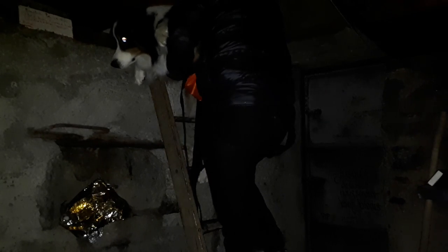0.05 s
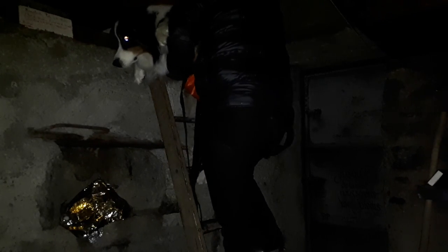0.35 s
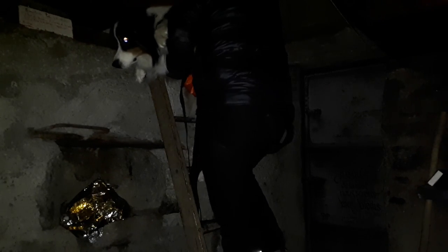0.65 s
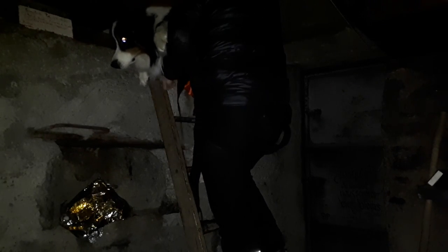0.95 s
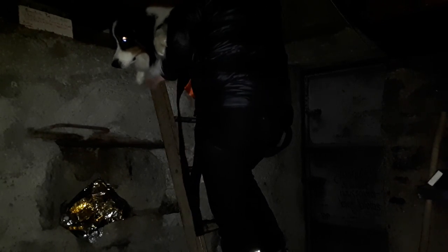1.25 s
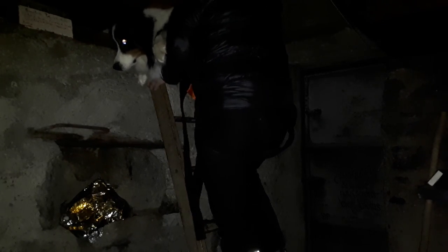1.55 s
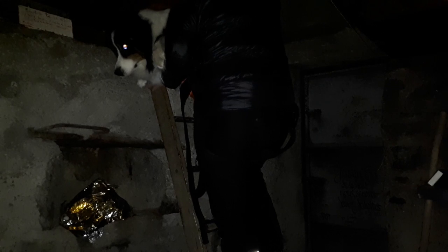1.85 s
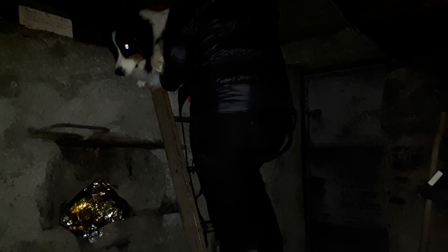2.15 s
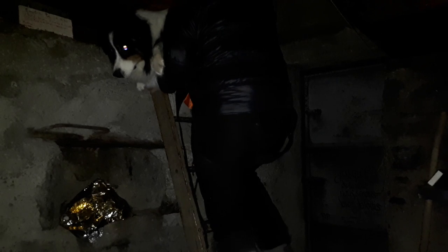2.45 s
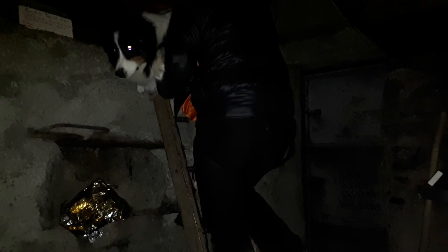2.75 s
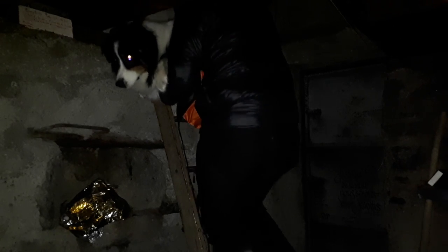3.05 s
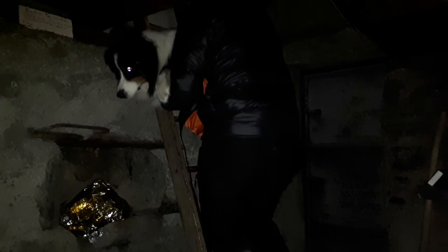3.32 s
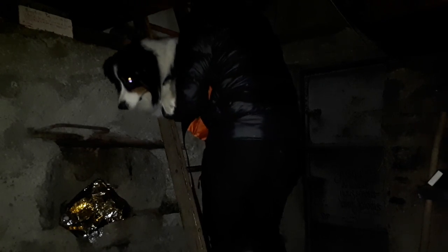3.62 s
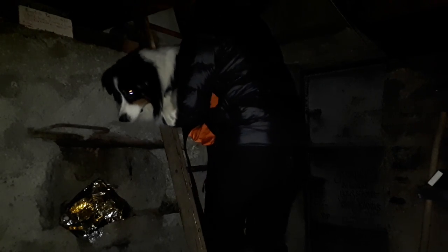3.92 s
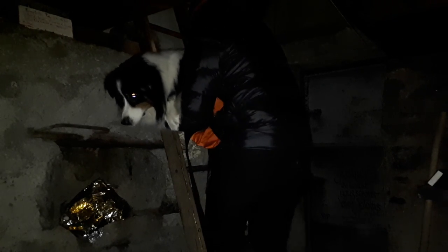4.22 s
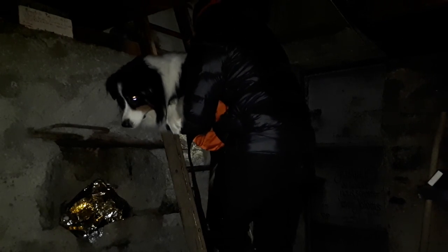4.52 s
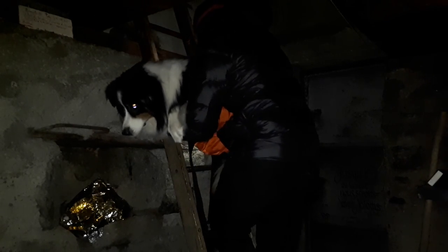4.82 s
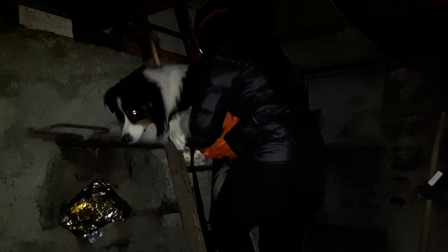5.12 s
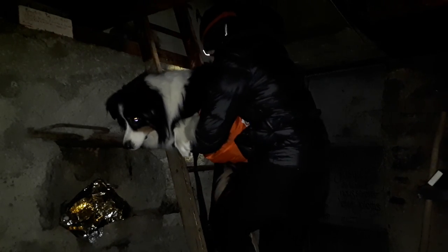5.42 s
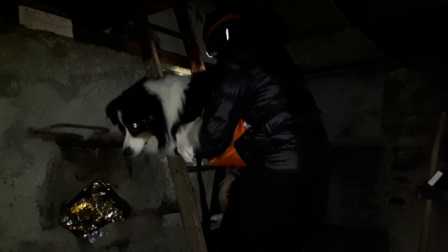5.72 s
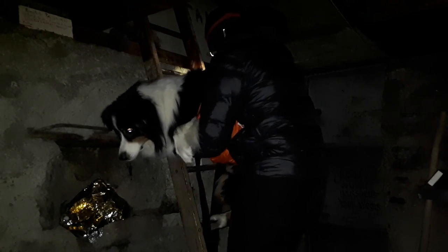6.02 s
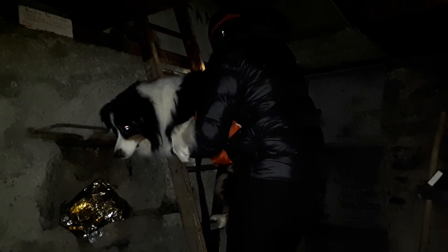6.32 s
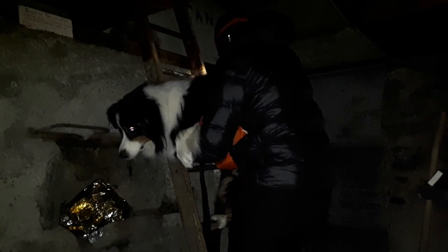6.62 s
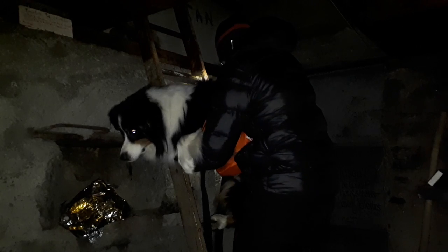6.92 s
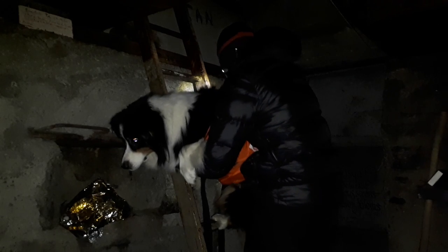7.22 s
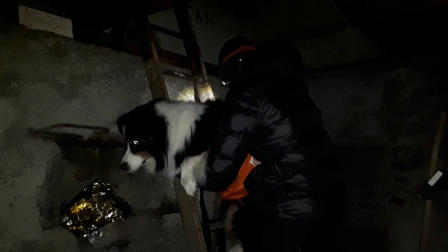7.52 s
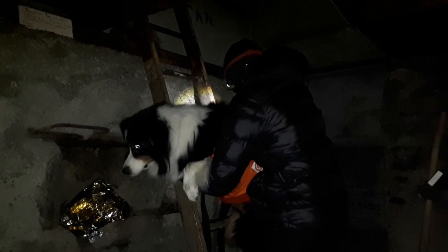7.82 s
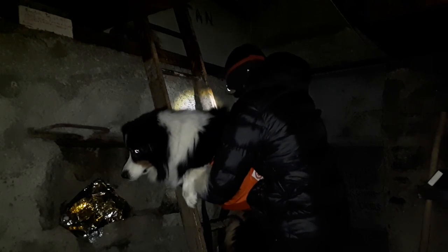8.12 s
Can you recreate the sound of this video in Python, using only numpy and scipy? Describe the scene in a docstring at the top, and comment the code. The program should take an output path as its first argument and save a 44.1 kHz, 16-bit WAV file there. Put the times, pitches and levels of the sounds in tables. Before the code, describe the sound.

Quiet rustling of a padded jacket runs through a slow descent on a wooden ladder. One loud, hollow boot knock comes near the start, then softer knocks, scuffs and sleeves dragging on wood. Past the middle a boot lands with a dull thud, followed by gritty scrapes and a brief groan of a sliding sole. The hut sounds small and still, with only a faint background hiss.

```python
"""Boots knock and rub on a wooden ladder as a person in a padded jacket climbs slowly down in a hut.
Each impact excites damped modes of the wood; one boot thuds on the floor and the hut booms low.
Sliding friction makes the nylon and trouser legs swish and the soles and hands groan on the ladder;
grit crunches underfoot. Close stone walls reflect these sounds over a faint rumble and hiss."""
import sys
import numpy as np
from scipy import signal
from scipy.fft import rfft, irfft
from scipy.io import wavfile

SR = 44100
rng = np.random.default_rng(int(sys.argv[2]) if len(sys.argv) > 2 else 0)


def wav_record(signal):
    """Record a signal, one row per channel, as 16-bit PCM in the file named by sys.argv[1]."""
    frames = np.transpose(np.atleast_2d(signal))
    bounded = np.clip(frames, -1, 1)
    # unit amplitude maps onto the largest positive 16-bit level
    quanta = np.round(bounded * 32767).astype(np.int16)
    wavfile.write(sys.argv[1], SR, quanta)


N = 364266
TIME = np.arange(N) / SR

# body movements: (peak time [s], rise [s], fall [s], jacket level [dB], trouser level [dB])
BODY_MOVES = [(0.0, 0.12, 0.61, -61.5, -70.0), (0.57, 0.14, 0.22, -59.5, -62.5),
              (0.89, 0.12, 0.12, -47, -57.5), (1.03, 0.053, 0.12, -53.5, -57.5),
              (1.31, 0.15, 0.082, -58.5, -57), (1.47, 0.1, 0.29, -50.5, -48.5),
              (1.65, 0.15, 0.3, -48.5, -50), (2.13, 0.28, 0.21, -51.0, -48),
              (2.49, 0.11, 0.27, -51.5, -48.5), (2.63, 0.31, 0.48, -53, -51.5),
              (2.99, 0.34, 0.058, -50, -50.5), (3.11, 0.32, 0.71, -53, -58.5), (3.52, 0.16, 0.41, -55, -74),
              (3.79, 0.22, 0.49, -56.5, -67), (4.05, 0.3, 0.44, -54.5, -64.5),
              (4.32, 0.14, 0.15, -54.5, -65.5), (4.49, 0.14, 0.79, -55, -62),
              (4.71, 0.06, 0.16, -54.5, -56.5), (4.94, 0.15, 0.24, -53.5, -64.5),
              (5.15, 0.24, 0.064, -51.5, -53), (5.6, 0.54, 0.2, -47.0, -47.5),
              (5.89, 0.18, 0.45, -50, -57.5), (6.1, 0.77, 0.072, -48.5, -56), (6.61, 0.053, 0.21, -56, -61),
              (6.92, 0.17, 0.16, -48.5, -59.5), (7.18, 0.3, 0.36, -46.0, -55.0),
              (7.31, 0.45, 0.52, -54, -59.5), (7.86, 0.06, 0.073, -58, -78.0),
              (8.051, 0.37, 0.47, -59, -67.5)]
# sleeves and soles dragging on the ladder: (peak time [s], rise [s], fall [s], level [dB])
DRAGS = [(0.0, 0.15, 0.18, -59.5), (0.63, 0.33, 0.61, -66.5), (1.66, 0.61, 0.06, -61.5),
         (2.14, 0.11, 0.2, -57.5), (2.71, 0.64, 0.71, -63.5), (3.46, 0.4, 1, -65.5),
         (4.75, 0.18, 0.22, -62.5), (5.16, 0.18, 0.09, -56.5), (5.44, 0.039, 0.32, -51),
         (5.65, 0.58, 0.11, -50), (5.92, 0.08, 0.28, -47), (6.71, 0.42, 0.28, -61),
         (6.89, 0.018, 0.41, -56.5), (7.15, 0.092, 0.57, -58), (7.46, 0.18, 0.42, -57.5)]
# friction spectra of nylon, trouser legs and rubbed wood: (frequency [Hz], gain [dB])
JACKET_SPECTRUM = [(100, -22.5), (400, -12), (900, 5), (2500, -2.5), (5000, 1.5), (9000, -3), (16000, 4)]
TROUSER_SPECTRUM = [(200, -28), (700, -19.5), (1100, -12), (1350, -6.5), (1750, -2.5), (2200, 1),
                    (2700, -0.5), (3200, -1.5), (3700, -5.5), (4700, -5), (7000, -13), (16000, -40)]
DRAG_SPECTRUM = [(100, -13.5), (300, -12), (550, -5), (700, 1.5), (800, -2.5), (920, 1), (1200, -2.5),
                 (1600, -6), (2500, -11.5), (6000, -26), (16000, -36)]
# spectra of the steady background: (frequency [Hz], gain [dB])
RUMBLE_SPECTRUM = [(20, -27.5), (40, -6.5), (65, 1), (100, -1), (130, 3.5), (180, -7), (250, -13),
                   (320, -6.5), (450, -15), (900, -16), (4000, -58)]
HISS_SPECTRUM = [(100, 0.5), (600, 11.5), (1300, -16), (2000, -8), (5000, 2), (16000, -8.5)]
# impacts on ladder and floor: (time [s], level [dB], low-pass cutoff [Hz], gain of main modes [dB])
LADDER_IMPACTS = [(.004, -52.5, 860, -10), (.303, -57, 1810, -7), (.79, -55.5, 924, -14),
                  (.885, -42.5, 1980, -4), (.9025, -22.5, 2390, -1.5), (1.012, -46, 2020, -6),
                  (1.298, -44.5, 1130, -7.5), (2.122, -47, 1600, -7.5), (2.988, -46, 800, -15),
                  (3.51, -51, 1200, -11), (5.82, -36, 1200, -15), (5.905, -42.5, 1510, -11),
                  (6.009, -52, 1605, -5), (6.602, -45, 1200, -8), (6.693, -56, 1200, -7),
                  (6.882, -61, 1200, 0), (7.39, -49.5, 420, 0), (7.794, -61, 1198, -2.5),
                  (7.852, -55.5, 1970, -14)]
FLOOR_IMPACTS = [(.93, -46, 90, 1), (1.302, -56, 350, -5), (5.479, -40.5, 240, -11), (5.51, -45, 258, -26),
                 (5.59, -59, 120, -16), (5.8175, -30.5, 2800, 1.5), (5.9, -40, 1200, -16),
                 (5.932, -44, 1500, -8.5), (6.18, -48, 120, -8), (7.96, -51.5, 108, -15),
                 (8.04, -50, 111, -13)]
# modes of the ladder: (frequency [Hz], gain [dB], T60 [s])
LADDER_MODES = [(124.2, -27, .2), (252.6, -22.5, 0.2), (315.6, -13.5, 0.14), (432.6, -13.5, 0.23),
                (496, -16.5, 0.13), (556, -20.5, 0.15), (705, -17, 0.19), (863.6, -2, 0.1076),
                (919, 1, 0.15), (1067, -18.5, .12), (1295, -11.5, .09), (1520, -23.5, .07),
                (1550, -19, .07), (1910, -19.5, 0.099), (2030, -27.5, .08)]
# modes of the wood, and the hut's long low boom near 126 Hz: (frequency [Hz], gain [dB], T60 [s])
FLOOR_AND_HUT_MODES = [(62.3, -26.5, .25), (126, -28, 1.96), (157.4, -10, 0.13), (221, -10.5, .08),
                       (255, 1.5, 0.089), (308.4, 0, 0.055), (374, -13.5, 0.042), (547, -24.5, .09),
                       (722, -26.5, .1), (963, -22, 0.12), (1155, -17, 0.099)]
# spectra of the dense, short-lived modes: (frequency [Hz], gain [dB])
LADDER_SPECTRUM = [(40, -24), (100, -14), (220, -16), (330, -8.5), (480, -3), (620, -1), (850, 10),
                   (1150, -1), (1550, -2.5), (2000, -14.5), (2600, -19.5), (6000, -22.5), (16000, -57)]
FLOOR_SPECTRUM = [(25, -23.5), (50, -3), (100, 0.5), (135, -1.5), (200, -8.5), (290, -0.5), (380, -4.5),
                  (480, -9), (1050, -11), (1500, -17), (3000, -23), (16000, -54)]
# soles and hands sliding: (start [s], duration [s], level [dB], centre at full speed [Hz])
GROANS = [(0.238, .24, -70.5, 1377), (3.187, 0.15, -57, 1498), (3.279, 0.2, -65, 322),
          (7.095, 0.093, -47, 1272), (7.179, .07, -51.5, 1066), (7.219, .16, -50, 1434)]
# soles on grit: (peak time [s], level [dB], rise constant [s], T60 [s], low edge [Hz], high edge [Hz])
GRIT_SCUFFS = [(1.29, -62, 0.034, 0.24, 1500, 3500), (2.133, -43, 0.014, 0.1, 3000, 8500),
               (2.992, -44.5, 0.011, 0.077, 400, 3500), (3.535, -58.5, 0.032, 0.23, 700, 4000),
               (4.725, -55, 0.027, 0.12, 2010, 5530), (5.421, -48, 0.023, 0.26, 250, 3520),
               (5.823, -41, 0.0036, 0.12, 400, 6600), (5.953, -46, 0.011, 0.14, 300, 2600),
               (6.617, -42.5, 0.019, 0.13, 890, 3770), (7.396, -34, 0.013, 0.18, 300, 4670),
               (7.422, -40, 0.0045, 0.1, 250, 2800), (7.485, -49.5, 0.024, 0.21, 297, 700),
               (7.568, -35, 0.0011, 0.18, 614, 1920), (7.578, -42, 0.0024, 0.26, 600, 1680),
               (7.856, -58, 0.0033, 0.17, 710, 2000)]
# spectrum of crunching grit: (frequency [Hz], gain [dB])
GRIT_SPECTRUM = [(100, -32), (310, -27), (410, -6), (750, -1.5), (1150, -6.5), (1500, -0.5), (2400, -2.5),
                 (2800, -1.5), (3300, -4.5), (4500, -5), (9000, -10), (16000, -41)]
# resonances excited by a scraping sole: (frequency [Hz], bandwidth [Hz], boost [dB])
SCRAPE_RESONANCES = [(425, 62, 9), (524, 34, 2), (680, 44, 3.5), (1533, 140, 1), (1835, 64, 8),
                     (2400, 57, 8), (2706, 115, 6.5), (4130, 45, 9)]
# echoes from the nearest walls and ceiling: (left delay [s], right delay [s], gain [dB])
REFLECTIONS = [(.0019, 0.0018, -28.5), (.0041, 0.0041, -20), (.0067, 0.007, -22), (0.009, 0.008, -12),
               (0.014, 0.017, -12.5), (0.0215, 0.021, -15.5)]
# reverberation time of the hut: (frequency [Hz], T60 [s])
HUT_T60 = [(60, 0.83), (100, 1.04), (135, 1.76), (250, 0.305), (900, 0.28), (3000, 0.16), (12000, 0.13)]
# likeness of the left and right sound pressure: (frequency [Hz], correlation [0..1])
CORRELATION = [(20, 0.81), (300, 0.68), (420, 0.69), (600, 0.38), (1000, 0.13), (16000, 0)]
# microphone response: (frequency [Hz], gain [dB])
MIC_RESPONSE = [(20, -3.5), (5500, 1), (6600, 4.5), (7700, 8.5), (8600, 0), (10000, 0), (12000, 0),
                (14000, -3.5), (16000, -4.5)]
# channel imbalance: (frequency [Hz], left minus right [dB])
MIC_BALANCE = [(100, -.5), (300, -1), (700, 3.5), (2000, 3), (16000, 3)]


def gain_of(db):
    return 10 ** (np.asarray(db) / 20)


def unit_rms(x):
    return x / np.sqrt(np.mean(x ** 2) + 1e-20)


def curve_at(points, hz):
    """Linear interpolation on a log-frequency axis."""
    f, value = np.transpose(points)
    return np.interp(np.log(hz + 1), np.log(f + 1), value)


def add(mix, start_s, sound):
    """Superposition: a stereo sound adds to the mix from start_s on."""
    part = mix[:, max(round(start_s * SR), 0):][:, :sound.shape[1]]
    part += sound[:, :part.shape[1]]


def filtered(x, kind, cutoff_hz, order=2):
    return signal.sosfilt(signal.butter(order, cutoff_hz, kind, fs=SR, output="sos"), x)


def noise(spectrum, size, grain_db=0):
    """Partial coherence: unit-rms stereo noise, alike in the bass; grain_db spreads its tiny snaps."""
    hz = np.fft.rfftfreq(size, 1 / SR)
    snaps = gain_of(grain_db * np.minimum(rng.exponential(1, size // 16 + 1), 6)).repeat(16)[:size]
    left, independent = rfft(rng.standard_normal((2, size)) * snaps)
    correlation = curve_at(CORRELATION, hz)
    right = correlation * left + np.sqrt(1 - correlation ** 2) * independent
    return unit_rms(irfft(np.array([left, right]) * gain_of(curve_at(spectrum, hz)), size))


def stroke_power(peak_s, rise, fall, drop_db=20):
    """Power envelope of one movement: it gains drop_db over its rise and loses it over its fall."""
    distance = np.maximum((peak_s - TIME) / rise, (TIME - peak_s) / fall)
    return gain_of(-drop_db * np.minimum(distance, 6) ** 1.182) ** 2  # exponent 1: pointed, 2: a bell


def friction(strokes, levels_db, spectrum, grain_db, flutter_db, flutter_hz):
    """Incoherent sources add in power: countless small slips, fluttering as the surfaces catch."""
    power = sum(gain_of(db) ** 2 * stroke for db, stroke in zip(levels_db, strokes))
    flutter = unit_rms(filtered(rng.standard_normal(N), "low", flutter_hz))
    return np.sqrt(power) * gain_of(flutter_db * flutter) * noise(spectrum, N, grain_db)


def cloth_swishes():
    """Sliding friction of cloth on cloth: jacket and trousers share each movement of the body."""
    moves = [stroke_power(*row[:3]) for row in BODY_MOVES]
    jacket_db, legs_db = np.transpose(BODY_MOVES)[3:]
    jacket = friction(moves, jacket_db, JACKET_SPECTRUM, grain_db=1, flutter_db=0.86, flutter_hz=24.9)
    legs = friction(moves, legs_db, TROUSER_SPECTRUM, grain_db=1, flutter_db=1, flutter_hz=25.05)
    return jacket + legs


def ladder_rubs():
    """Sliding friction on wood: dragging sleeves and soles give a darker, grainier noise."""
    drags = [stroke_power(*row[:3]) for row in DRAGS]
    levels_db = np.transpose(DRAGS)[3]
    return friction(drags, levels_db, DRAG_SPECTRUM, grain_db=2, flutter_db=1.5, flutter_hz=20.54)


def early_reflections(dry):
    """Comb filtering: delayed copies interfere with the direct sound; the overall level is kept."""
    out = dry.copy()
    for left_s, right_s, db in REFLECTIONS:
        add(out[:1], left_s, gain_of(db) * dry[:1])
        add(out[1:], right_s, gain_of(db) * dry[1:])
    return out * dry.std() / out.std()


def background():
    """Stationary noise: a faint, steady rumble and hiss."""
    return gain_of(-67.5) * noise(RUMBLE_SPECTRUM, N) + gain_of(-73) * noise(HISS_SPECTRUM, N)


def impacts(events, modes, spectrum, build_s, hold_s, align_s, right_lag_s,
            dense_db, dense_t60, strike_db, strike_s):
    """Modal superposition: main and dense modes are driven while a sole rolls on, then decay freely."""
    out, t = np.zeros((2, N)), np.arange(SR) / SR
    since_arrival = np.maximum(t - np.array([[0], [right_lag_s]]), 0)
    since_release = np.maximum(t - hold_s, 0)
    ring = np.zeros((2, SR))
    for k, (hz, db, t60) in enumerate(modes):
        wave = (-1) ** k * np.sin(2 * np.pi * hz * (since_arrival - align_s))  # neighbours oppose
        ring += gain_of(db - 60 * since_release / t60) * wave
    ring *= 1 - np.exp(-since_arrival / build_s)
    overshoot_db = strike_db * np.exp(-t / strike_s)  # a hard edge strikes above the level of the push
    attack = np.minimum(t * 1000, 1)
    dense_envelope = gain_of(dense_db - 60 * since_release / dense_t60 + overshoot_db) * attack
    for start_s, db, cutoff_hz, ring_db in events:
        vibration = gain_of(ring_db) * ring + noise(spectrum, SR) * dense_envelope
        add(out, start_s, gain_of(db) * filtered(vibration, "low", cutoff_hz))  # softer is duller
    return out


def ladder_knocks():
    """Impact excitation: boots and hands set the ladder's modes ringing almost at once."""
    return impacts(LADDER_IMPACTS, LADDER_MODES, LADDER_SPECTRUM,
                   build_s=0.0013, hold_s=0.034, align_s=0.00605, right_lag_s=0.00021,
                   dense_db=-6.5, dense_t60=0.22, strike_db=4.5, strike_s=0.0034)


def hut_reverberation(dry):
    """Diffuse reflections between stone walls decay exponentially, the bass most slowly."""
    white = noise([(20, 0), (20000, 0)], SR)
    hz, t, bands = signal.stft(white, SR, nperseg=512)
    decay = gain_of(-60 * t / curve_at(HUT_T60, hz)[:, None])
    tail = signal.istft(bands * decay, SR, nperseg=512)[1]
    tail *= np.minimum(np.arange(tail.shape[1]) / SR / 0.00854, 1) ** 2  # reflections build up
    return signal.fftconvolve(dry, tail / np.linalg.norm(tail[0]), axes=1)[:, :N]


def sliding_groans(relative_width=0.23, pitch_sag=0.22):
    """Friction-driven resonance: pitch and level follow the speed of a sliding sole or hand."""
    out = np.zeros((2, N))
    for start_s, duration, db, hz in GROANS:
        t = np.arange(0, duration, 1 / SR)
        speed = np.sin(np.pi * (t / duration) ** 0.7)  # speeds up faster than it slows down
        pole = np.exp(-np.pi * relative_width * hz / SR)
        slips = rng.standard_normal((2, 2, len(t)))
        in_phase, quadrature = signal.lfilter([1], [1, -2 * pole, pole ** 2], slips)
        phase = 2 * np.pi * np.cumsum(hz * (1 - pitch_sag * (1 - speed))) / SR
        groan = unit_rms(in_phase * np.cos(phase) + quadrature * np.sin(phase))
        add(out, start_s, gain_of(db) * speed * groan)
    return out


def floor_thuds():
    """Impact excitation: landing weight drives the modes of the floor and the hut's long low boom."""
    return impacts(FLOOR_IMPACTS, FLOOR_AND_HUT_MODES, FLOOR_SPECTRUM,
                   build_s=0.014, hold_s=0.037, align_s=0.0031, right_lag_s=0.00017,
                   dense_db=-3.5, dense_t60=0.16, strike_db=0.5, strike_s=0.0039)


def grit_scuffs():
    """Granular friction: grit crunches as a sole presses, excites resonances and dies away."""
    out, hz = np.zeros((2, N)), np.geomspace(20, SR / 2, num=900)
    boost_db = sum(db / (1 + (2 * (hz - centre) / width) ** 2) for centre, width, db in SCRAPE_RESONANCES)
    spectrum = np.transpose([hz, curve_at(GRIT_SPECTRUM, hz) + boost_db])
    t = np.arange(SR) / SR - 0.2  # zero at the peak
    for peak_s, db, rise, t60, low_hz, high_hz in GRIT_SCUFFS:
        press = np.exp(np.minimum(t, 0) / rise) * gain_of(db - 60 * np.maximum(t, 0) / t60)
        crunch = noise(spectrum, SR, grain_db=-2.5) * press
        crunch = filtered(crunch, "high", low_hz)  # a light touch has less bass
        add(out, peak_s + t[0], filtered(crunch, "low", high_hz, order=3))
    return out


def scene():
    """Superposition: swishes and rubs get early reflections; impacts and soles reverberate."""
    rustle = early_reflections(cloth_swishes() + ladder_rubs())
    knocks, thuds = ladder_knocks(), floor_thuds()
    soles = sliding_groans() + grit_scuffs()
    room = hut_reverberation(gain_of(-20) * knocks + gain_of(-15.5) * thuds + gain_of(-11) * soles)
    return rustle + background() + knocks + thuds + soles + room


def record(dry, low_cut_hz=29.4, band_limit_hz=15850):
    """Linear filtering: microphone response, stronger on the left in the treble, then the band limits."""
    hz = np.fft.rfftfreq(N, 1 / SR)
    response_db = curve_at(MIC_RESPONSE, hz) + np.array([[0.5], [-0.5]]) * curve_at(MIC_BALANCE, hz)
    heard = irfft(rfft(dry) * gain_of(response_db), N)
    heard = filtered(heard, "high", low_cut_hz, order=4)
    low_pass = signal.firwin(1023, band_limit_hz, window=("kaiser", 9), fs=SR)
    return signal.oaconvolve(heard, low_pass[None], "same")


dry = scene()
out = record(dry)
wav_record(out)
```